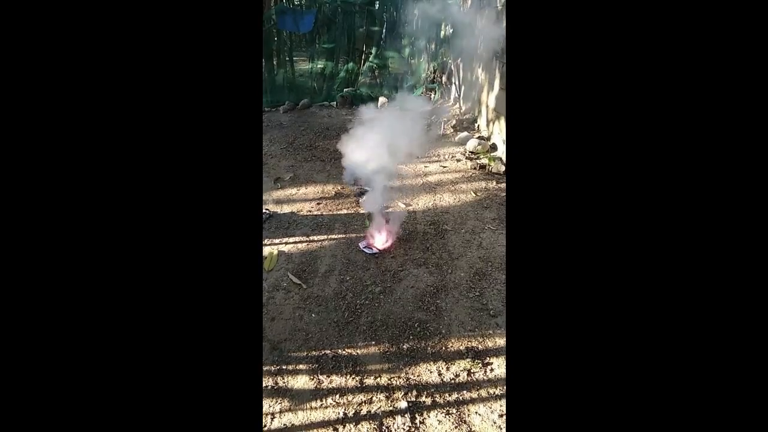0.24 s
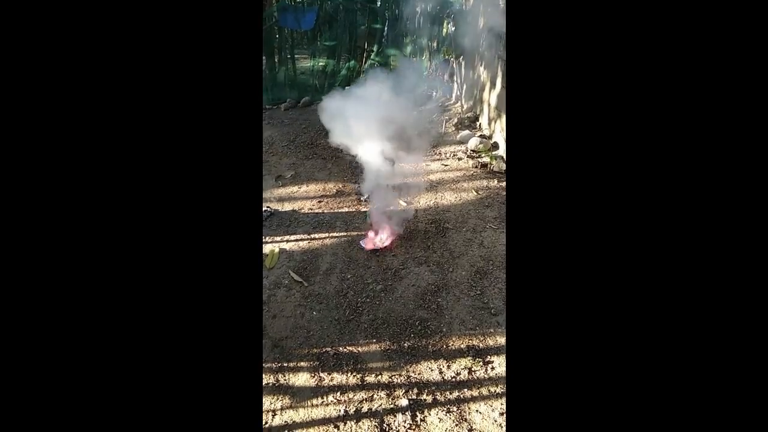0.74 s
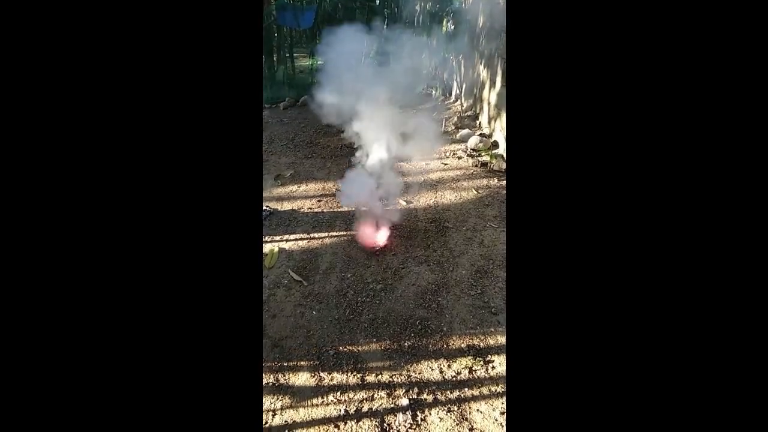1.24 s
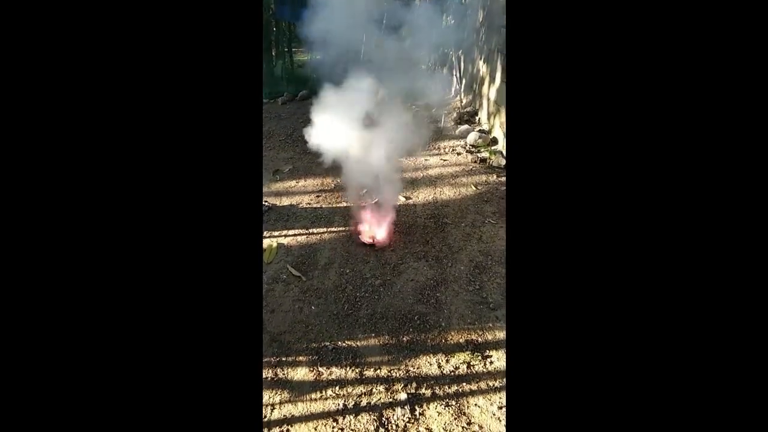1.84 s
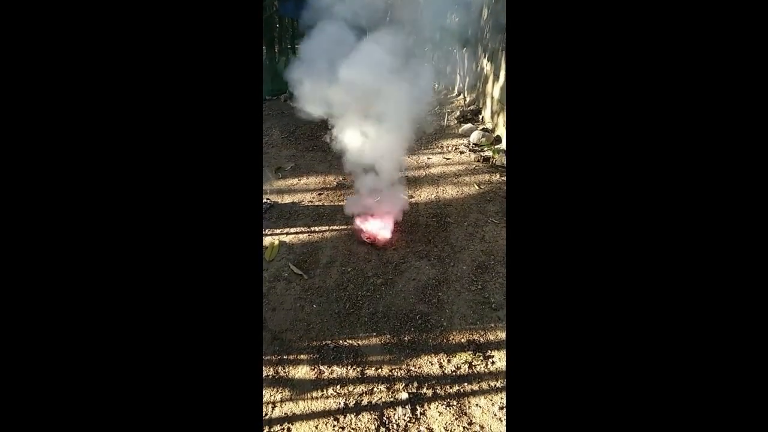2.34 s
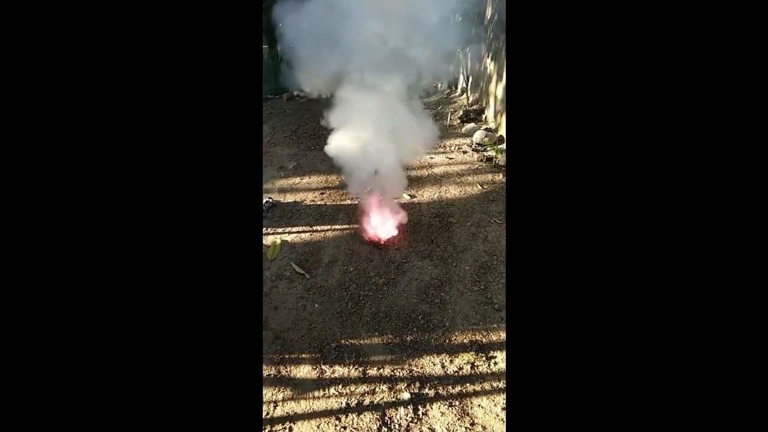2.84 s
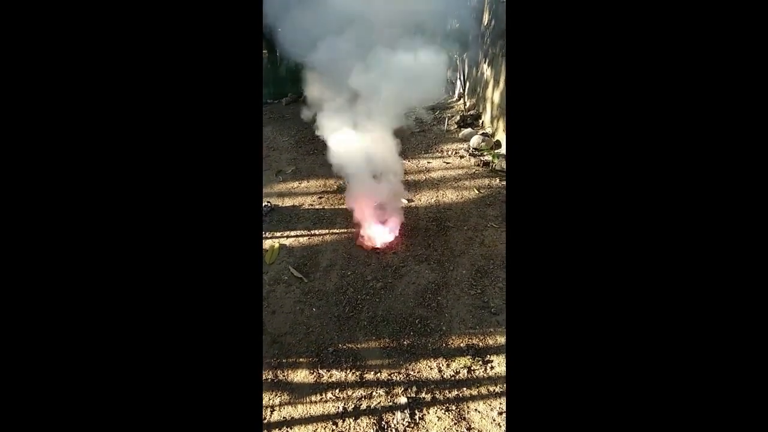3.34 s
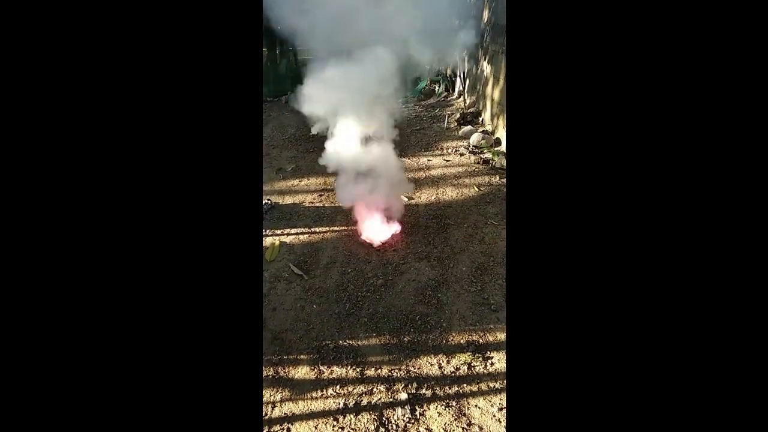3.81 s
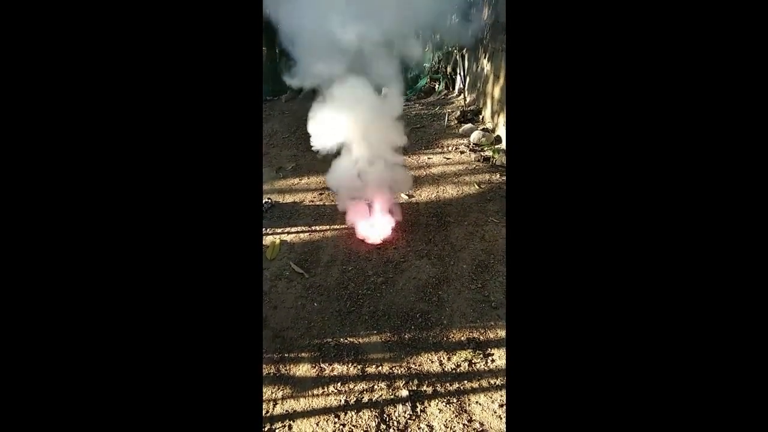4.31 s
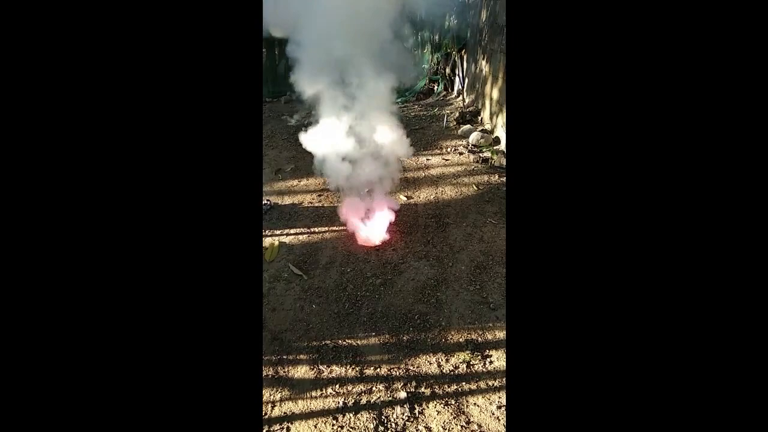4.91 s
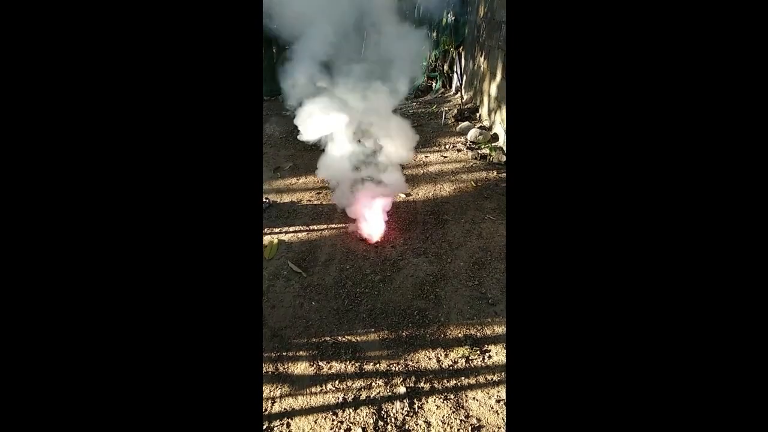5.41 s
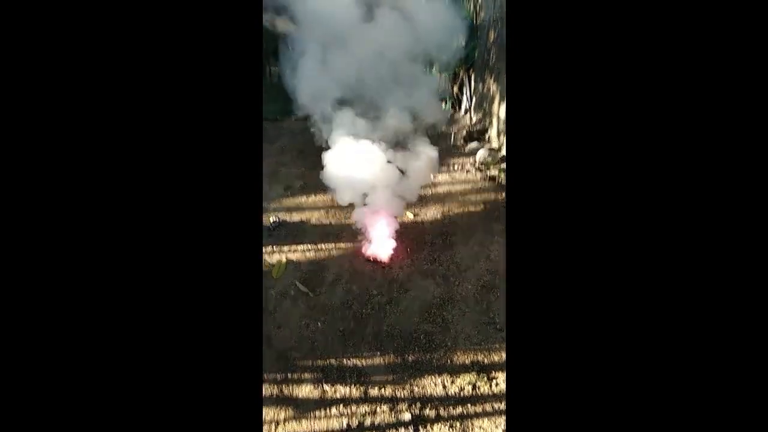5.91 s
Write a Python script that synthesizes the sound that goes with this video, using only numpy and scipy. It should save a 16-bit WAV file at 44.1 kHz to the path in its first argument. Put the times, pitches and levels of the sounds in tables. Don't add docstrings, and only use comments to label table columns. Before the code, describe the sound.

Outdoors, a smoke charge burns with a steady fizzing hiss that gradually swells, a low roar underneath, and occasional dry snaps of burning fuel.

```python
import sys
import numpy as np
from scipy import signal
from scipy.fft import rfft, irfft, next_fast_len
from scipy.io import wavfile
from scipy.ndimage import uniform_filter1d, map_coordinates

SR = 44100
rng = np.random.default_rng(int(sys.argv[2]) if len(sys.argv) > 2 else 0)


def wav_record(signal):
    frames = np.transpose(np.atleast_2d(signal))
    bounded = np.clip(frames, -1, 1)
    quanta = np.round(bounded * 32767).astype(np.int16)
    wavfile.write(sys.argv[1], SR, quanta)


def gain_from_decibels(decibels):
    exponent = np.asarray(decibels, float) / 20
    return 10 ** exponent


N = 271656

# time in seconds, jet strength in dB,
# left minus right in dB.
BURN = [(0, -37, 0.5), (.56, -34.5, -2.5), (1.15, -32, -1), (1.3, -32, -0.5), (1.55, -32.5, 0.5),
        (1.8, -30.5, -1.5), (1.95, -32.5, -4.5), (2.15, -31.5, -2), (2.6, -32, -1.5), (2.9, -32, -1),
        (3.45, -30, -2.5), (3.6, -31.5, 2), (3.92, -33, 1), (4.25, -30.5, -0.5), (4.76, -30, -1),
        (5.2, -31, 2), (5.35, -28.5, -2), (5.85, -29, -1.5), (6.16, -29, -2.5)]
# time in seconds, change in dB, length in seconds.
FLARES = [
    (1.06, 2.5, .04),
    (2.95, 1.5, .04),
    (3.44, 1.5, .02),
    (5.37, 1.5, .04),
    (6.0, -1.5, .04),
    (6.1, 2.1, .03),
]
# pitch in Hz, level in dB per Hz.
JET = [(60, -27.5), (130, -12), (180, -4.5), (250, -6.5), (400, -2.5), (800, -7), (1600, -6), (3000, -6),
       (5000, -5), (6600, -4), (8300, -1.5), (11000, 1.5), (13000, -3.5), (15500, -11.5)]
# time in seconds, peak in dB, centre in Hz, width in Hz, left minus right in dB.
POPS = [(1.043, -19, 10500, 6000, 8), (1.076, -22, 10500, 6000, -6), (2.2956, -11, 2500, 1300, 1),
        (2.2956, -9, 6200, 1500, 1), (2.2956, -11, 13000, 5000, -3), (2.2969, -18, 14000, 1500, 12),
        (2.3001, -12.5, 13300, 2500, 13), (3.4253, -16, 11700, 2000, 8), (3.4328, -19, 11000, 4500, 8),
        (3.5300, -15, 11800, 2000, 8), (5.5479, -9, 9300, 2500, 0), (5.5489, -12, 12000, 2500, 3),
        (5.5516, -9, 12000, 1800, 7), (5.5523, -11, 9500, 1800, 4), (6.154, -14, 10000, 6000, -9)]
# delay in ms, gain, dull above this many Hz.
LEFT_ECHOES = [(0.258, 0.82, 880), (0.684, -0.61, 41000), (0.949, 0.39, 40090), (1.045, -0.26, 3380),
               (1.58, -1.06, 252), (2.238, 0.77, 253), (2.625, -0.47, 2350), (3.301, -0.14, 2230),
               (3.616, 0.62, 2740), (5.345, -0.35, 665)]
RIGHT_ECHOES = [(0.202, 0.35, 40130), (1.979, -0.6, 830), (2.68, -0.46, 630), (3.598, 0.37, 4800),
                (3.852, 0.15, 12800), (5.181, -0.082, 15480), (5.662, -0.69, 322), (6.415, 0.35, 3180)]
# gain, lag in ms, sway in ms, sways per second.
GROUND = (0.35, 1.6, -2.1, 3.5)
# gain, delay in ms, dull above this many Hz.
BODY = (.3, 3.61, 5500)
# pitch in Hz, width in Hz, gain.
LEFT_CAVITY = (13240, 860, 0.77)
# pitch in Hz, width in Hz, depth from 0 to 1.
FINGER = (9200, 720, 0.24)
# lag in ms, sway in ms, sways per second.
ROUND_THE_HAND = [(.885, .014, 1.5), (1.55, .08, 12), (2.2, .08, 14)]
# pitch in Hz, half width in
# Hz, gain (minus means inverted).
SHARED_BANDS = [
    [(4480, 240, -1), (6100, 330, .9)],
    [(7720, 190, -1), (8600, 150, .7), (7250, 100, .5)],
    [(8050, 70, -.6), (3600, 110, -.9), (5050, 130, .5), (6950, 80, -.7), (9250, 120, .7), (11200, 350, .6),
     (14600, 400, -.4)],
    [(2850, 90, .5), (3850, 90, .7), (5450, 130, -.9), (6650, 150, .8), (8950, 90, -.8), (10250, 200, .8),
     (12600, 300, .5), (13300, 250, .4)],
]
# time in seconds, share from 0 to 1.
FIRST_SHARE = [(0, 0.6), (.4, 0.8), (1.2, 0.9), (2.3, 0.75), (2.6, 0.7), (3.0, 0.9), (3.55, 0.5), (3.8, 0.5),
               (4.05, 0.6), (4.3, 0.8), (4.65, 0.6), (5.1, 0.7), (5.4, .99), (5.68, .99), (5.8, 0.9),
               (6.16, 0.5)]
# time in seconds, share lost, length in seconds.
SHARE_DIPS = [(1.31, 0.89, 0.064), (1.78, 0.56, .025), (1.94, .6, 0.041), (2.95, 0.55, 0.027), (3.14, .5, .03),
              (3.38, 0.49, .04), (3.48, 0.52, 0.044), (3.9, 0.55, 0.051), (4.1, 0.42, .05), (4.34, .4, 0.025),
              (5.27, 0.28, 0.018), (5.73, 0.36, 0.042), (5.91, 0.61, .03)]

LEFT_LAG_MS = 0.038
HAND_MS, HAND_GAIN = 0.694, .27
BAND_HZ = 45 * 2 ** np.arange(0, 9, .5)
SIZE = next_fast_len(N + 4096)
HZ = np.arange(SIZE // 2 + 1) * SR / SIZE + 1e-3


def delay(ms):
    return np.exp(-2j * np.pi * HZ * ms / 1000)


def walk(rate):
    k = int(SR / rate)
    held = np.repeat(rng.standard_normal(N // k + 1), k)
    return 1.3 * uniform_filter1d(uniform_filter1d(held, k), k)[:N]


def bump(time, at, length):
    return np.exp(-((time - at) / length) ** 2)


def swayed(x, lag_ms, sway_ms, rate):
    place = np.arange(N) - (lag_ms + sway_ms * walk(rate)) * SR / 1000
    return map_coordinates(x, [place], order=3)


def windows(bands):
    return sum(gain / (1 + ((HZ - hz) / width_hz) ** 4) for hz, width_hz, gain in bands)


def port_echoes(echoes):
    return 1 + sum(gain * delay(ms) / (1 + 1j * HZ / dull_hz) for ms, gain, dull_hz in echoes)


def paths():
    return np.array([port_echoes(LEFT_ECHOES) * delay(LEFT_LAG_MS), port_echoes(RIGHT_ECHOES)])


def ports(top_hz=12200, power=0.44):
    hz, db = np.transpose(JET)
    colour = gain_from_decibels(np.interp(np.log(HZ), np.log(hz), db)) * np.minimum(HZ / hz[0], 1) ** 0.27
    cavity_hz, cavity_width, cavity_gain = LEFT_CAVITY
    finger_hz, finger_width, finger_depth = FINGER
    cavity = 1 + cavity_gain / (1 + ((HZ - cavity_hz) / cavity_width) ** 2)
    shade = 1 - finger_depth / (1 + ((HZ - finger_hz) / finger_width) ** 2)
    facing = (1 + (HZ / top_hz) ** 4) ** power
    return colour * np.array([cavity * shade * facing, np.ones(len(HZ))])


def band_shares(mean_shares=(.78, .5, .5), wander_rate=14):
    time = np.arange(N) / SR
    grip = np.interp(time, *np.transpose(FIRST_SHARE))
    for at, lost, length in SHARE_DIPS:
        grip = grip - lost * bump(time, at, length)
    others = [share + .28 * walk(wander_rate) for share in mean_shares]
    return np.clip([grip] + others, 0, .99)


def scattered(a, b, db_at_1k=-9, slope=1.055, most=5.85):
    power = gain_from_decibels(db_at_1k) * (HZ / 1000) ** slope
    ground_gain = GROUND[0]
    a = (a + ground_gain * swayed(a, *GROUND[1:])) / np.hypot(1, ground_gain)
    ways = sum(swayed(a, *way) for way in ROUND_THE_HAND) / np.sqrt(len(ROUND_THE_HAND))
    around = .6 * ways + .83 * b
    left, taken = 0, 0
    for bands, share in zip(SHARED_BANDS, band_shares()):
        mixed = share * a + np.sqrt(1 - share ** 2) * around[::-1]
        weight = windows(bands)
        left = left + weight * rfft(mixed, SIZE)
        taken = taken + weight ** 2
    hand = 1 - HAND_GAIN * delay(HAND_MS) / (1 + (8900 / HZ) ** 8)
    left = left + np.sqrt(np.clip(1 - taken, 0, 1)) * rfft(around, SIZE) * hand
    body_gain, body_ms, body_hz = BODY
    body = 1 + body_gain * delay(body_ms) / (1 + (HZ / body_hz) ** 4)
    return np.sqrt(power / (1 + power / most)) * body * np.array([left, rfft(a, SIZE)])


def pop_paths(edge_ms=.324):
    straight = 1 / (1 + (HZ / 3200) ** 4)
    edge = .5 / (1 + (HZ / 8200) ** 8)
    left = (.9 - edge) * delay(LEFT_LAG_MS) + edge * delay(edge_ms) - .2 * delay(HAND_MS)
    return straight * paths() + (1 - straight) * np.array([left, delay(0)])


def pops(tail_ms=2., tail_db=-21, thin_hz=1300):
    t, out = np.arange(600) / SR, np.zeros((2, SIZE))
    sparks = rng.standard_normal((len(POPS), 2, len(t)))
    for (s, db, hz, width_hz, pan_db), spray in zip(POPS, sparks):
        ring = np.exp(-np.pi * width_hz * t) * np.cos(2 * np.pi * hz * t)
        spray = signal.lfilter(ring[:40], 1, spray * np.exp(-t * 1000 / tail_ms))
        level = gain_from_decibels(db + np.array([[pan_db], [-pan_db]]) / 2)
        k = int(s * SR)
        out[:, k:k + len(t)] += (ring + gain_from_decibels(tail_db) * spray) * level
    thin = (1j * HZ / thin_hz / (1 + 1j * HZ / thin_hz)) ** 2
    return irfft(rfft(out) * thin * pop_paths(), SIZE)[:, :N]


def gas(spit_rate=900, spit_db=2.0, spit_share_db=-9, sputter_db=0.0):
    streams = rng.standard_normal((3, N)) * gain_from_decibels(sputter_db * walk(120))
    when, sign, size = rng.random((3, N))
    spits = (when < spit_rate / SR) * np.sign(sign - .5) * gain_from_decibels(-spit_db * np.log(size + 0.0032))
    streams[:2] += gain_from_decibels(spit_share_db) * spits / np.std(spits)
    return streams


def burn_swings(burn, growth_db=6, grows_s=3.1, mid_share=0.52, mid_lag_s=.4):
    time = np.arange(N) / SR
    flame = -growth_db * np.exp(-time / grows_s)
    mid = mid_share * uniform_filter1d(burn, int(mid_lag_s * SR), mode="nearest")
    flares = sum(db * bump(time, at, length) for at, db, length in FLARES)
    return [flame - flame.mean(), mid, burn + flares]


def hiss(gust_db=.3, flicker_db=.5, trim_db=0., shade_hz=3000):
    s, hiss_db, pan_db = np.transpose(BURN)
    time = np.arange(N) / SR
    near, a, b = gas()
    straight = rfft(near, SIZE) * paths() / (1 + (HZ / shade_hz) ** 4)
    heard = ports() * (straight + scattered(a, b))
    top = heard.mean(axis=0) * (HZ > 5500) * (HZ < 15500)
    heard *= gain_from_decibels(np.mean(hiss_db) + trim_db) / np.std(irfft(top, SIZE)[:N])
    burn, pan = (np.interp(time, s, db - np.mean(db)) for db in (hiss_db, pan_db))
    swings = burn_swings(burn)
    gust, out = walk(11.0), 0
    for hz in BAND_HZ:
        band = np.cos(np.pi * np.clip(np.log2(HZ / hz), -.5, .5)) ** 2
        shares = [np.interp(np.log(hz), np.log([700, 2500, 7000]), one) for one in np.eye(3)]
        turn = np.interp(np.log(hz), np.log([6000, 14000]), [0, 1.5])
        gust = .8 * gust + .6 * walk(12)
        unrest = gust_db * gust + flicker_db * walk(20)
        db = np.dot(shares, swings) + (1 - shares[0]) * unrest
        out = out + irfft(heard * band, SIZE)[:, :N] * gain_from_decibels(db + turn * np.array([pan, -pan]) / 2)
    return out


def scene():
    return pops() + hiss()


def low_pass(x):
    return signal.sosfilt(signal.butter(12, 15900, fs=SR, output="sos"), x)


def record(dry):
    return low_pass(dry)


dry = scene()
out = record(dry)
wav_record(out)
```